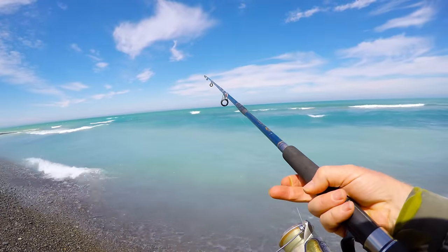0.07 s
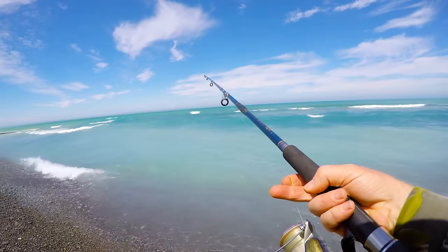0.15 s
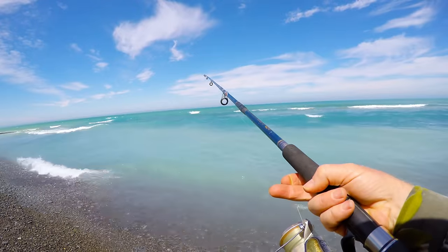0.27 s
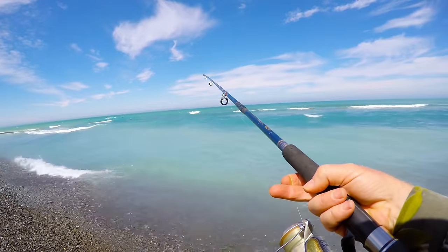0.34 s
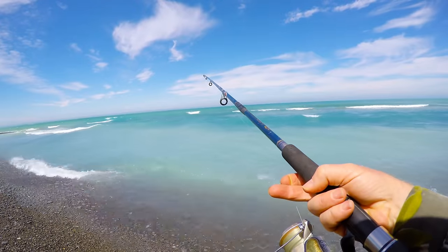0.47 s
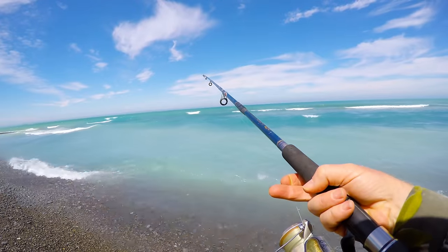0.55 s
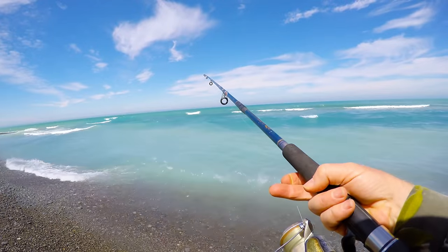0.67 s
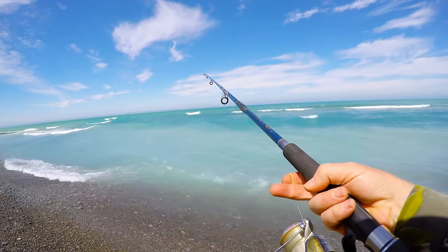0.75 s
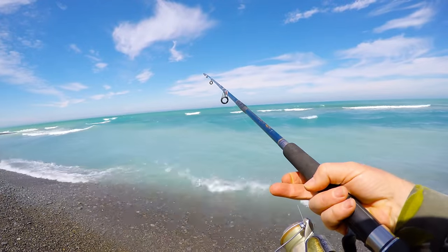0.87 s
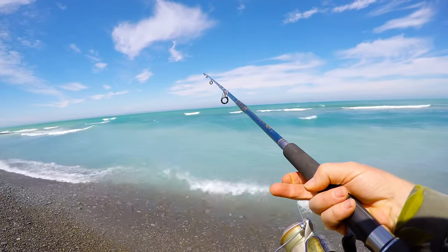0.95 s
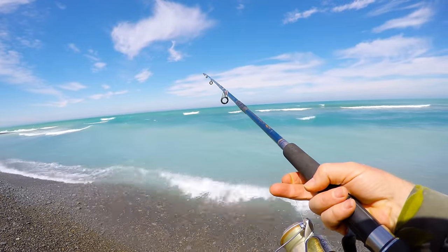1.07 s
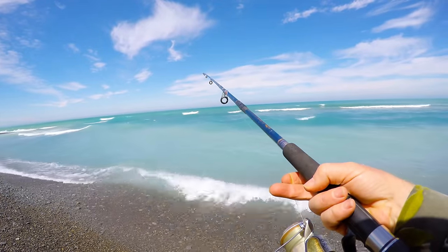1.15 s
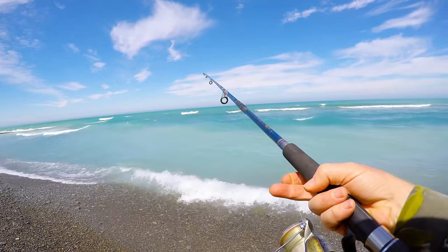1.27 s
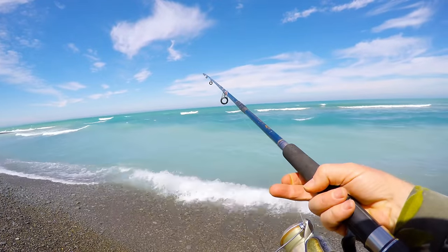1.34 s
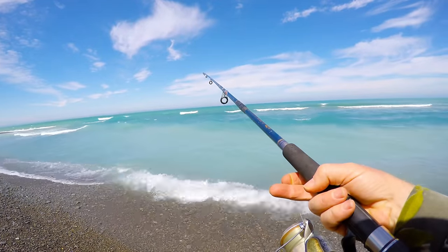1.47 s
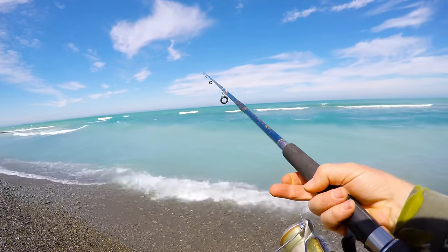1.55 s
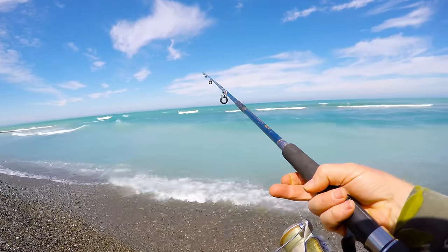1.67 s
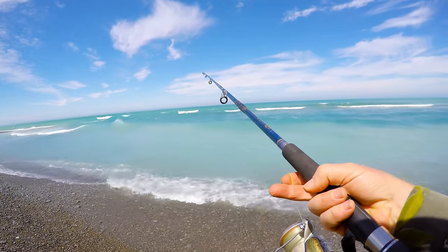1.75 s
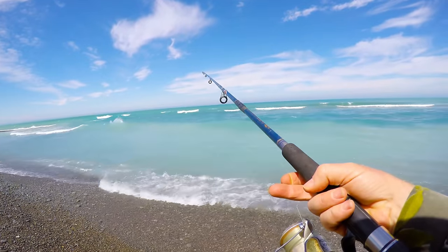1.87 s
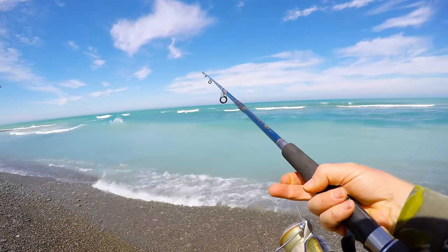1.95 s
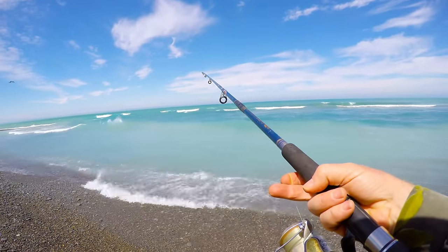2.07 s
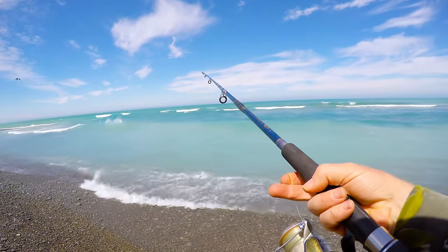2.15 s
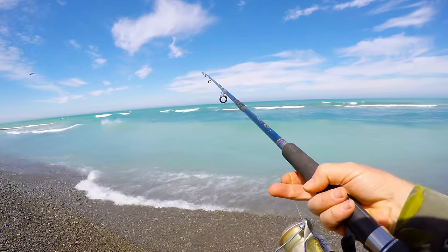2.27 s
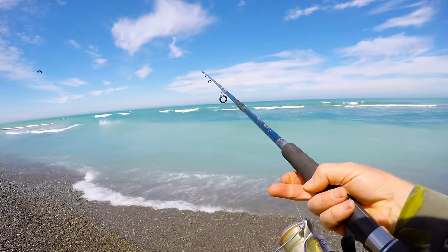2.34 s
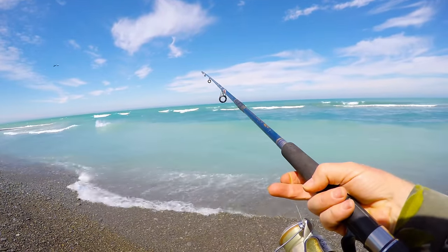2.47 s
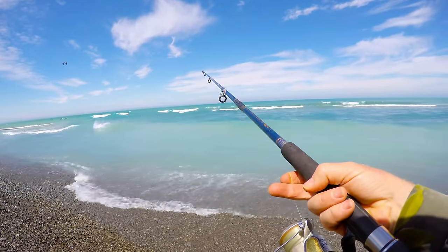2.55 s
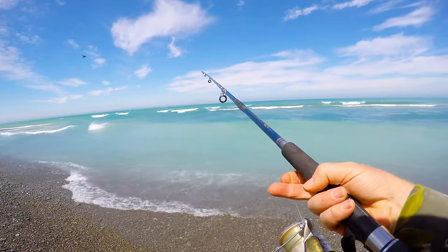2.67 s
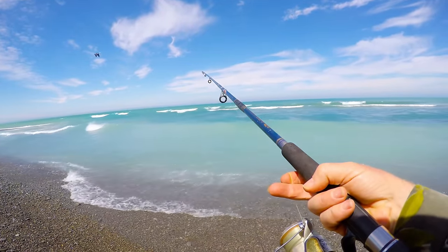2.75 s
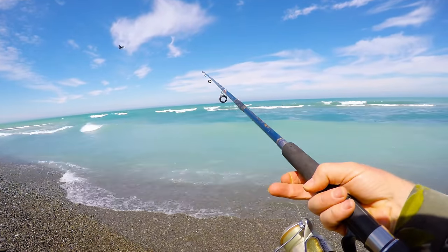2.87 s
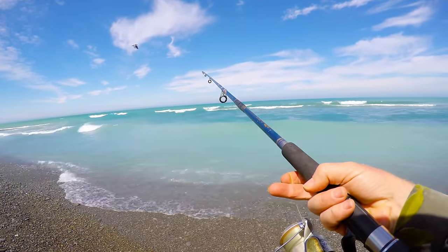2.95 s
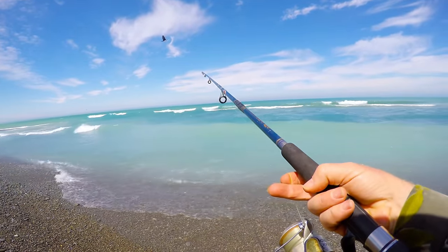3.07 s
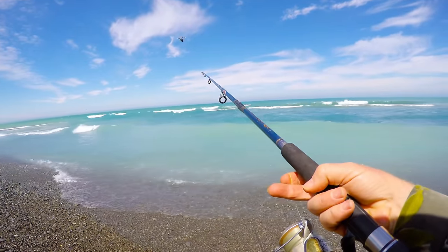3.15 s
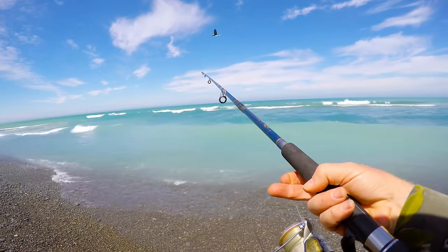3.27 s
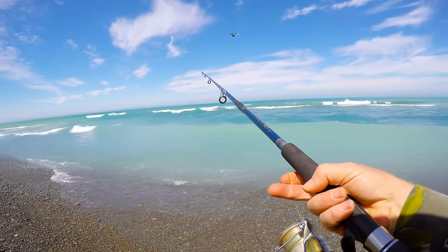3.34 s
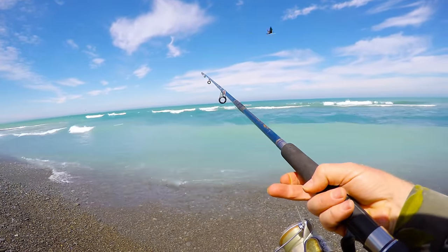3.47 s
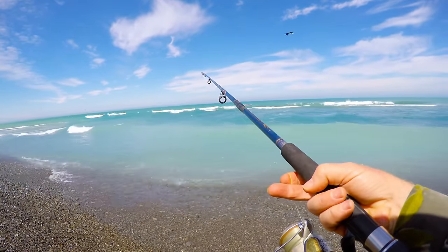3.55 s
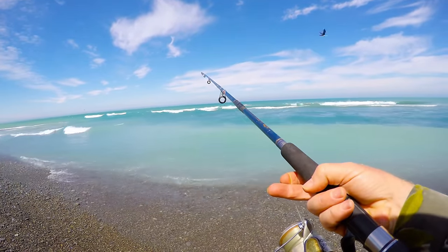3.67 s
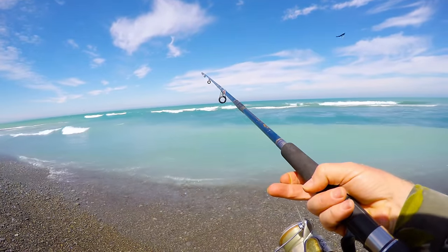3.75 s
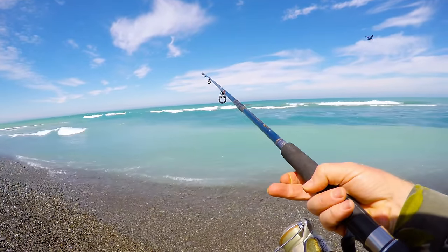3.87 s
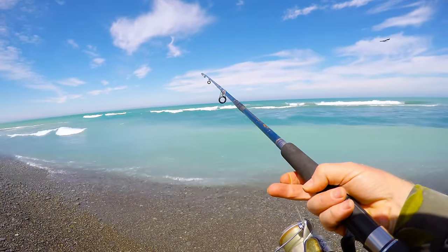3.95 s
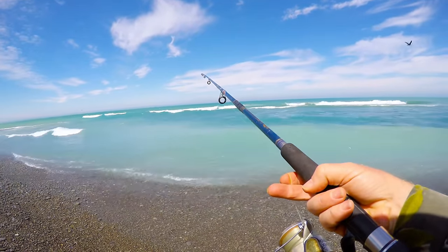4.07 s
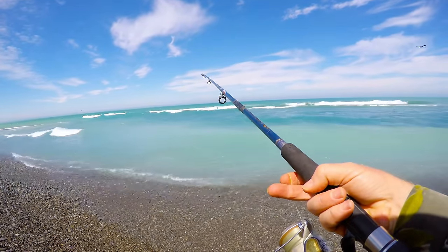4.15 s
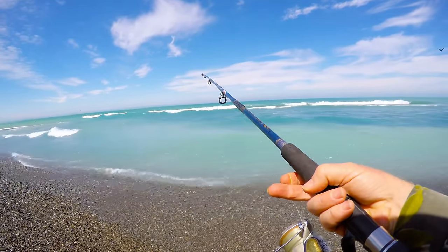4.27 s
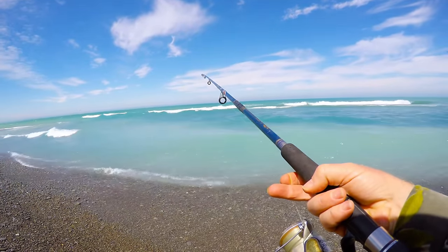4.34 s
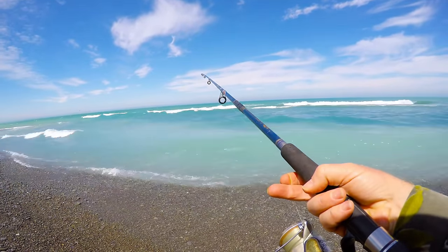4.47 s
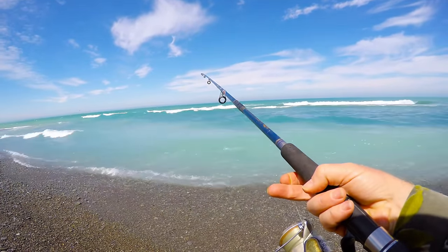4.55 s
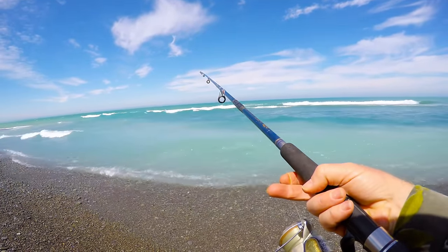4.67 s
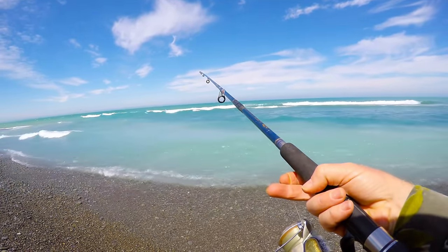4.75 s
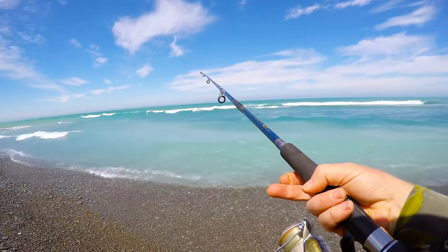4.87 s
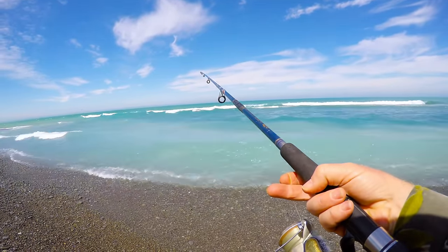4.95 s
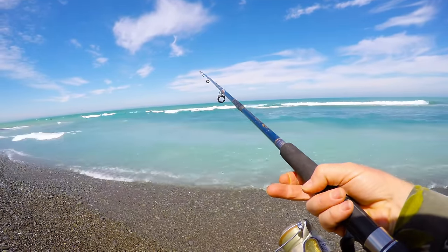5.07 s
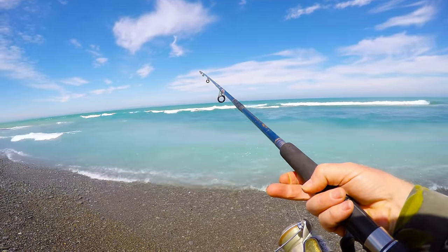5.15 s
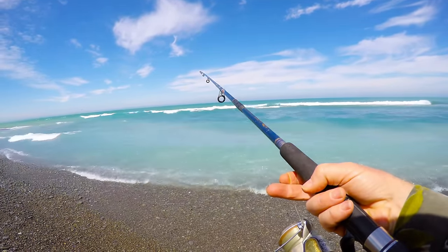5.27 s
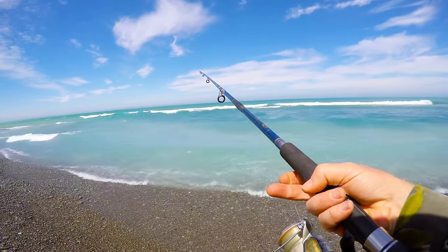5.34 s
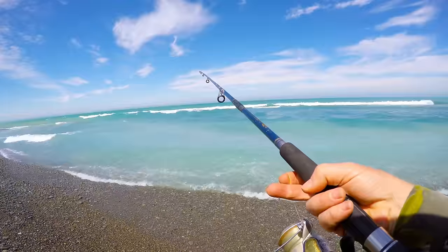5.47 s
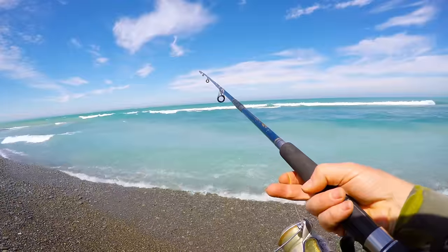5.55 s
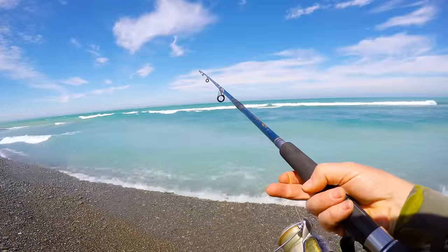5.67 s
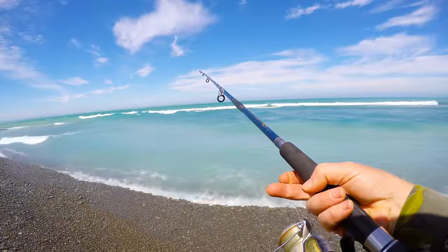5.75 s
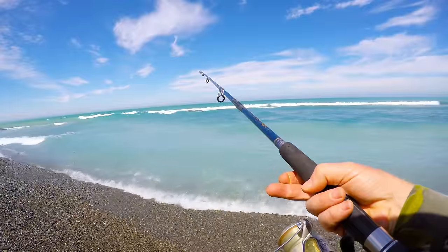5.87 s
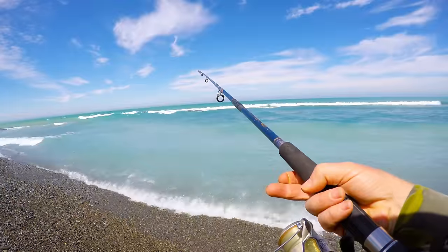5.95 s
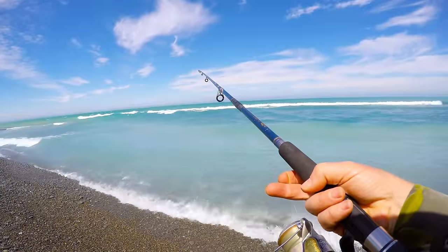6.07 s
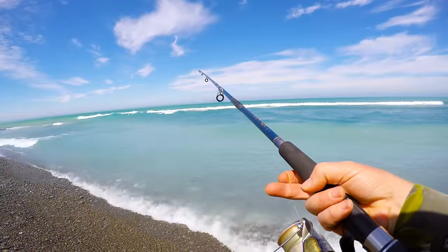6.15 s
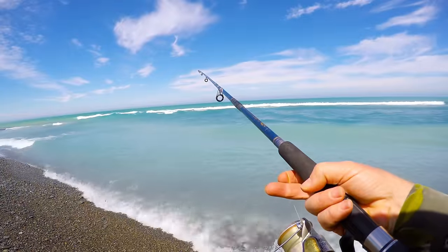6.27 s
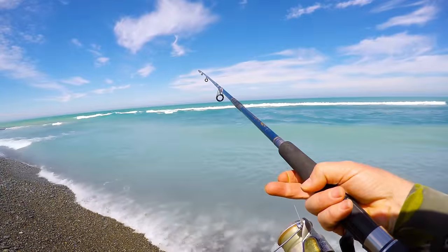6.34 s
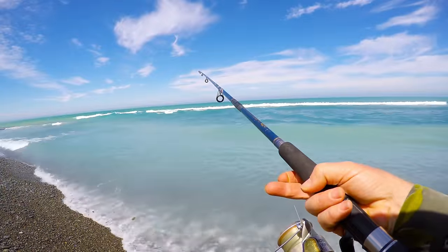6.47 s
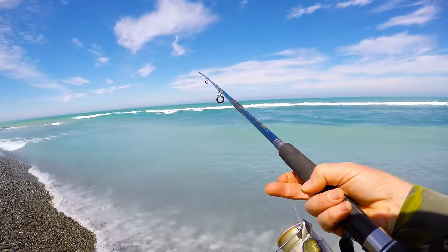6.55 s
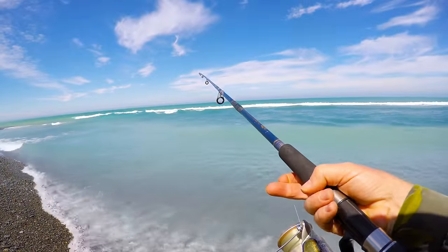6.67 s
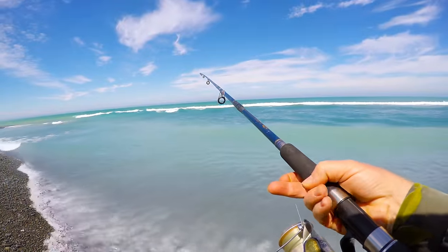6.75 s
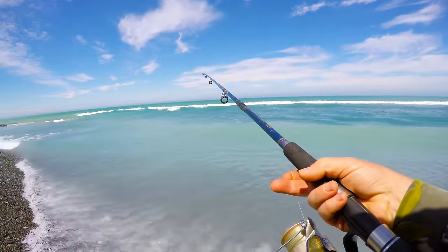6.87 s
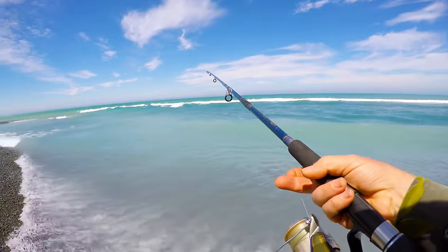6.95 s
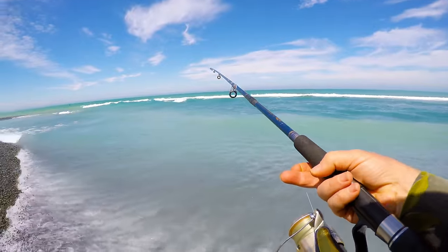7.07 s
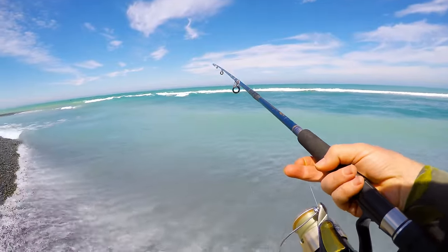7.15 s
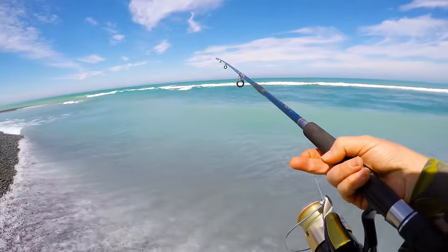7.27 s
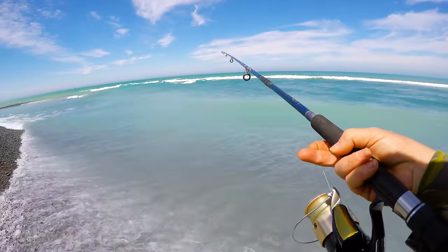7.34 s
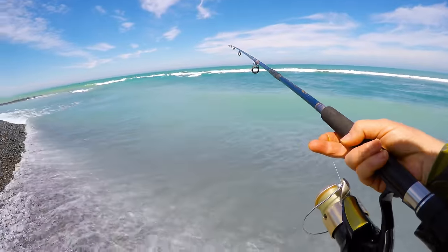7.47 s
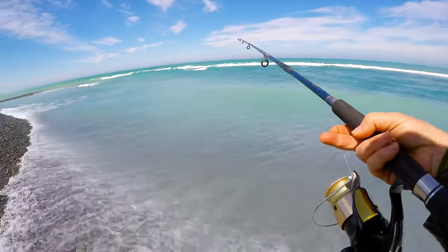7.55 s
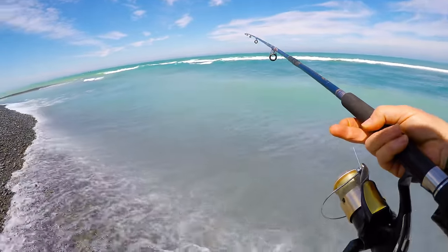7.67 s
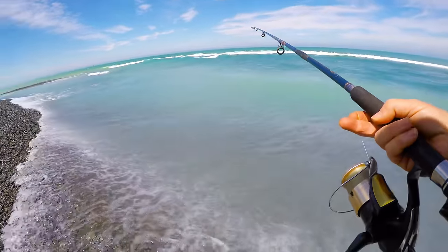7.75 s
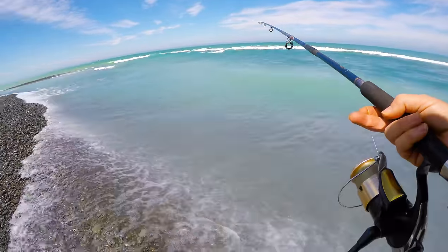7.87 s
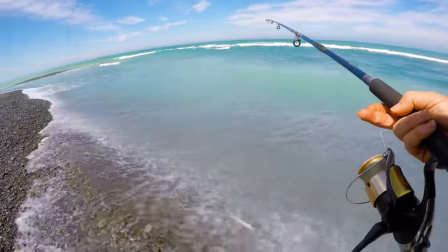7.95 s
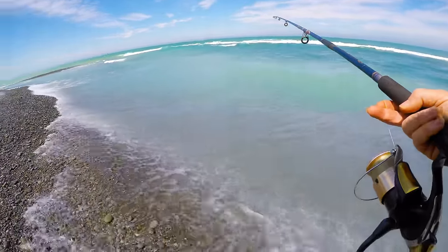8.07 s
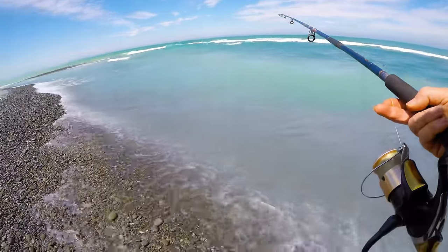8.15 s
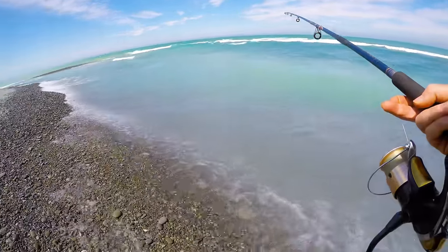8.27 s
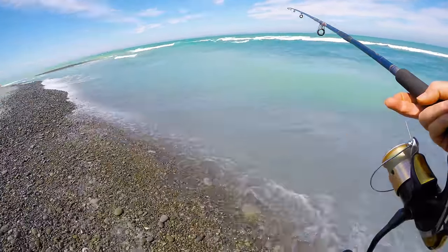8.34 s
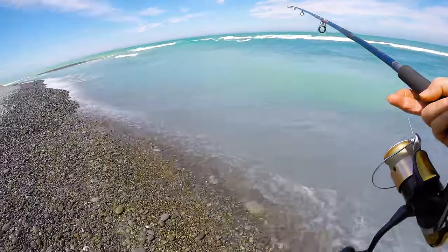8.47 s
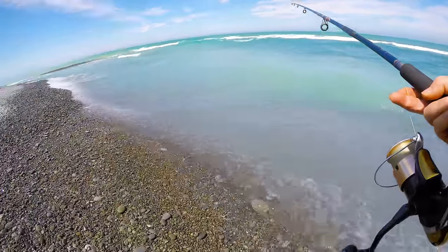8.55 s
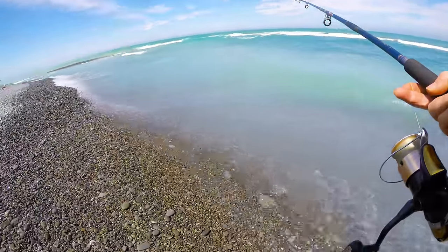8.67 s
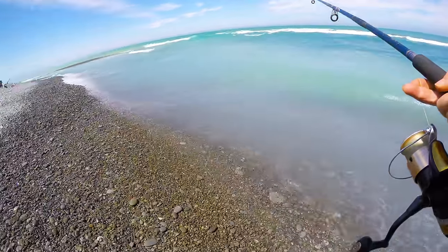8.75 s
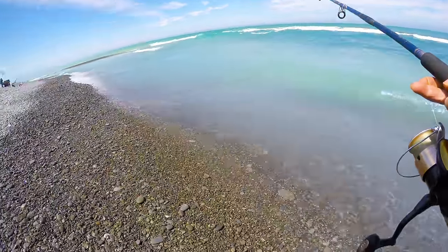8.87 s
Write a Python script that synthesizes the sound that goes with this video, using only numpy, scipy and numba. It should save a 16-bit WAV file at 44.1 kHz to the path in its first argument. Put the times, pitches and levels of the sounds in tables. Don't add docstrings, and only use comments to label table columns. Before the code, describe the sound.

On a pebble shore, a wave drains with a fizzing wash, then smaller splashes and a quiet stretch follow. Near the middle the sound cuts to nothing for an instant and returns. Late on, a quick run-up grows into the strongest surge, which drains back over stones. Wind rumbles and thumps on the closed microphone housing throughout, giving the surf a boxy, muffled colour.

```python
import sys
import numpy as np
from scipy import signal
from scipy.fft import rfft, irfft, next_fast_len
from scipy.io import wavfile
from scipy.ndimage import uniform_filter1d
from numba import njit

SR = 44100
rng = np.random.default_rng(int(sys.argv[2]) if len(sys.argv) > 2 else 0)


def gain_from_db(level_db):
    decades = np.asarray(level_db, float) / 20
    return 10 ** decades


def to_wav(sig):
    pcm = np.clip(np.atleast_2d(sig), -1, 1) * 32767
    pcm = np.round(pcm).astype(np.int16)
    wavfile.write(sys.argv[1], SR, pcm.T)


N = 392931


def unit(x):
    return x / np.sqrt(np.mean(x ** 2))


def colour(table):
    hz, db = np.transpose(table)
    return lambda f: np.interp(np.log(f), np.log(hz), db)


def tint(x, db_of_hz):
    size = next_fast_len(N)
    hz = np.maximum(np.arange(size // 2 + 1) * SR / size, 1)
    return irfft(rfft(x, size) * gain_from_db(db_of_hz(hz)), size)[..., :N]


def walk(rate_hz):
    hold = int(SR / rate_hz)
    steps = np.repeat(rng.standard_normal(N // hold + 1), hold)
    smooth = uniform_filter1d(uniform_filter1d(steps, hold), hold)
    return unit(smooth[:N])


def swells(s, db, rise, fall):
    hop = 64
    since = np.arange(0, N + hop, hop)[:, None] / SR - s
    bells = np.exp(-(since / np.where(since < 0, rise, fall)) ** 2)
    power = (gain_from_db(2 * db) * bells).sum(axis=1)
    return np.interp(np.arange(N), hop * np.arange(len(power)), power)


@njit
def ring(start, turn, fade, glide, size, n):
    out = np.zeros(n)
    for k in range(len(start)):
        z, w, i = size[k] + 0j, turn[k], start[k]
        while abs(z) > .005 * size[k] and i < n:
            out[i] += z.imag
            z *= fade[k] * np.exp(1j * w)
            w *= glide[k]
            i += 1
    return out


def grains(count, low_hz, high_hz, cycles, rise, scatter_db):
    moment, pitch, luck = rng.random((count, 3)).T
    hz = low_hz + (high_hz - low_hz) * pitch
    life = cycles * SR / hz
    size_db = np.minimum(-scatter_db * np.log(1 - luck), 15)
    size = gain_from_db(size_db) / np.sqrt(life)
    start = (moment * N).astype(np.int64)
    turn = 2 * np.pi * hz / SR
    glide = (1 + rise) ** (1 / life)
    return unit(ring(start, turn, np.exp(-1 / life), glide, size, N))


# (crest time [s], level [dB], rise [s], fall [s])
SURGES = [
    (-.1, -38.5, .2, 0.58),
    (1.29, -51, 0.44, 0.59),
    (5.41, -49.5, .21, 0.26),
    (5.95, -43.5, 0.074, 0.35),
    (6.6, -42, 0.28, 0.11),
    (6.92, -33.5, .28, 0.1),
    (7.25, -34.5, .2, 0.34),
    (7.65, -39, 0.31, 0.27),
    (8.85, -48, .15, .3),
]
# (crest time [s], level [dB], rise [s], fall [s])
LANDINGS = [
    (.985, -47.5, .012, 0.5),
    (1.55, -53, 0.085, 0.14),
    (2.08, -51, .08, 0.17),
    (4.48, -56.5, .17, .47),
    (5.86, -49, 0.038, .12),
    (6.0, -46, 0.089, .13),
    (6.42, -55, 0.07, .12),
    (6.89, -42.5, .08, 0.07),
    (7.18, -44, .02, .13),
    (8.54, -49, 0.18, .58),
]
# (crest time [s], level [dB], rise [s], fall [s])
FOAM = [
    (-0.11, -49, 0.2, 0.43),
    (1.06, -58, 0.61, 0.96),
    (4.25, -67, 0.47, 0.34),
    (6.02, -61.5, 0.68, 0.14),
    (6.77, -46.5, 0.47, 0.36),
    (7.21, -52.5, 0.11, 0.26),
    (8.66, -49.5, 0.21, 0.54),
]
# (crest time [s], level [dB], rise [s], fall [s])
BREAKERS = [
    (1.21, -56, 0.5, 0.64),
    (3.0, -62, 0.61, 0.31),
    (4.35, -60.5, 0.5, 0.48),
    (6.24, -53.5, 0.89, 0.32),
    (7.06, -54.5, 0.9, 0.48),
]
SURGE_DB = [-31, -22.5, -9.5, 0.5, -6, -12, -19.5, -29.5]
LANDING_DB = [-10, -25, -17.5, .8, 0, -0.5, -10, -19.5]
FOAM_DB = [-22, -19.5, -20, 3, 4.5, -0.9, 0.5, -7]
BREAKER_DB = [-4, -0.5, -9.5, 4.5, 5, 4.1, -9.5, -31.5]
SEA_DB = [-57, -62, -60.5, -51.5, -51, -56.5, -63.5, -71.5]


def water_db():
    kinds = [(SURGES, SURGE_DB), (LANDINGS, LANDING_DB), (FOAM, FOAM_DB), (BREAKERS, BREAKER_DB)]
    power = 0
    for events, band_db in kinds:
        power = power + gain_from_db(2 * np.array(band_db))[:, None] * swells(*np.transpose(events))
    brief_lift_db = 0.5 * swells(8.2, 0, 0.19, 0.2)
    shore_db = np.array(SEA_DB)[:, None] + brief_lift_db
    return 10 * np.log10(gain_from_db(2 * shore_db) + power)


# (frequency [Hz], width [Hz], level [dB])
HOUSING = [(318, 69, -4.5), (558, 21, 5.5), (640, 83, 5.5), (720, 60, -4.5), (794, 110, -3.5),
           (1025, 230, 4.5), (1297, 310, -3.5), (1655, 410, 7.5), (2400, 180, 2.5), (3070, 87, 1.5),
           (3510, 320, -1.5), (4050, 350, 7.5), (4804, 340, -9), (5700, 210, 5), (6290, 270, -4),
           (6830, 430, 5), (7190, 200, -9), (7290, 650, 3), (8820, 450, -4.5), (9860, 390, -5),
           (10500, 900, 2), (11700, 600, -4.5)]


def housing(hz):
    return sum(db / (1 + (2 * (hz - f) / width) ** 2) for f, width, db in HOUSING)


# (frequency [Hz], level [dB])
SURF_COLOUR = [(60, -4), (150, -19), (400, -12), (1000, -11), (2000, -3), (3500, -13.5), (5500, -24),
               (8000, -32.5), (11000, -36), (15000, -44.5)]
# (low edge [Hz], high edge [Hz])
ZONES = [(140, 300), (400, 720), (850, 1350), (1450, 2150), (2250, 3200), (3600, 4600), (5100, 8300),
         (9000, 14000)]


def surf():
    bubbles = grains(count=30000, low_hz=300.7, high_hz=8970, cycles=8.6, rise=0.0513, scatter_db=2.5)
    ticks = grains(count=40000, low_hz=2550, high_hz=14800, cycles=0.78, rise=0, scatter_db=1.5)
    water = rng.standard_normal(N) + gain_from_db(-8) * bubbles + gain_from_db(-9) * ticks
    size = next_fast_len(N)
    hz = np.maximum(np.arange(size // 2 + 1) * SR / size, 1)
    sound = rfft(water, size) * gain_from_db(colour(SURF_COLOUR)(hz) + housing(hz))
    power = 2 * np.abs(sound) ** 2 / size / N
    lift_db = []
    for db, (low, high) in zip(water_db(), ZONES):
        lift_db.append(db - 10 * np.log10(power[(hz > low) & (hz < high)].sum()))
    middles = np.log2(np.sqrt(np.prod(ZONES, axis=1)))
    out, shared, before = 0, walk(18), walk(25)
    for octave in np.arange(6, 14.1, 1 / 3):
        place = np.interp(octave, middles, np.arange(len(ZONES)))
        k = min(int(place), len(ZONES) - 2)
        db = lift_db[k] + (place - k) * (lift_db[k + 1] - lift_db[k])
        own = walk(25)
        fine = np.clip((octave - 10) / 5.5, 0, 1)
        db = db + (0.072 + 0.25 * fine) * shared
        db = db + (0.35 + 0.27 * fine) * (own + before)
        before = own
        share = np.clip(1 - 3 * np.abs(np.log2(hz) - octave), 0, 1)
        out = out + gain_from_db(db) * irfft(sound * share, size)[:N]
    return out


# (time [s], level [dB], centre [Hz], rise [s], fall [s])
SPLASHES = [(.02, -41.5, 2400, 0.037, 0.52), (.62, -44.5, 2400, .05, 0.41), (.975, -47, 3150, .004, .1),
            (.977, -47, 4050, .006, .12), (1.291, -40, 4020, .01, 0.048), (5.9, -42, 2400, .05, .3),
            (6.3, -49, 5700, .05, .3), (6.65, -49, 2400, .08, 0.23), (7.0, -46, 3000, 0.12, 0.9),
            (7.953, -62, 8000, 0.00084, .004), (8.368, -50, 5700, .002, .006),
            (8.44, -56, 7000, .001, .004), (6.97, -45, 1000, .03, .12), (7.7, -44, 2120, .05, 0.22),
            (2.25, -61, 720, .05, .2), (5.84, -55, 5700, .006, .15)]


def splashes():
    out = np.zeros(N)
    for s, db, hz, rise, fall in SPLASHES:
        width_hz = hz / 13 + 1.7 / rise
        edges_hz = [hz - width_hz / 2, hz + width_hz / 2]
        band = signal.butter(2, edges_hz, "band", fs=SR, output="sos")
        spray = unit(signal.sosfilt(band, rng.standard_normal(N)))
        since = np.maximum(np.arange(N) / SR - s, 0)
        out += gain_from_db(db) * spray * (1 - np.exp(-since / rise)) * np.exp(-since / fall)
    return out


# (time [s], slow buffet level [dB], faster flutter level [dB], rise and fall [s])
GUSTS = [(.12, -41, -51, 0.056), (.38, -44.5, -47.5, .08), (.65, -43, -50, 0.19), (1.08, -40, -47, .14),
         (1.5, -40, -43.5, .2), (1.95, -47.5, -45, .12), (2.268, -40, -42, 0.086), (2.55, -43, -43.5, 0.18),
         (3.0, -46, -42.5, 0.14), (3.72, -52, -44.5, 0.077), (3.9, -41, -60, 0.069),
         (4.25, -41.5, -52, 0.25), (5.0, -40, -46, .08), (5.25, -48, -53, .07), (5.75, -39, -55, .2),
         (6.12, -43, -47, 0.057), (6.36, -36, -52, 0.049), (6.62, -39, -46, .08), (6.93, -40.5, -48, .12),
         (7.4, -38, -50, .11), (7.75, -38, -47.5, 0.11), (8.17, -38, -41.5, 0.15), (8.499, -39, -52, 0.11)]
# (frequency [Hz], level per Hz [dB])
WIND_COLOUR = [(4.7, -33), (8.0, -3), (27, 7), (39, 4), (61, -0.5), (155, -16), (200, -33.5), (260, -50),
               (440, -120)]
# (time [s], peak level [dB], swing rate [Hz], length [swings], push +1 or pull -1)
SLAPS = [(.889, -31, 55, 0.55, -1), (1.099, -28, 45, 0.5, 1), (2.209, -29, 38, 0.6, 1),
         (2.255, -28, 39, 0.5, 1), (2.314, -27.5, 50, 0.84, 1), (2.91, -29.5, 51, 0.61, -1),
         (3.167, -27.5, 30, 0.75, -1), (3.466, -30.5, 41, 0.28, -1), (4.271, -28, 35, 0.75, 1),
         (4.386, -29, 25, 0.43, -1), (5.002, -32, 28, 0.57, -1), (5.026, -31, 45, .7, 1),
         (8.094, -24.5, 27.6, 1.24, -1), (8.156, -23, 40, 0.92, 1), (8.188, -29, 45, 0.54, 1),
         (8.213, -28.5, 20, 0.57, -1), (8.243, -33, 26, .5, 1), (8.263, -28.5, 34, 0.71, -1),
         (8.366, -21, 42.6, 0.86, 1), (8.478, -28, 25, 0.58, 1)]


def wind():
    s, buffet_db, flutter_db, length = np.transpose(GUSTS)
    buffet = np.sqrt(gain_from_db(2 * -46) + swells(s, buffet_db, length, length))
    flutter = np.sqrt(gain_from_db(2 * -49.5) + swells(s, flutter_db, length, length))
    air = tint(rng.standard_normal(N), colour(WIND_COLOUR))
    low = tint(air, colour([(44, -0.5), (62, -35)]))
    gusts = buffet * unit(low) + flutter * unit(air - low)
    calm, slaps = np.ones(N), np.zeros(N)
    for s, db, hz, swings, push in SLAPS:
        turns = (np.arange(N) / SR - s) * hz
        calm *= 1 - 0.49 * np.exp(-(turns / (1.5 * swings)) ** 2)
        slaps += push * gain_from_db(db) * np.exp(-(turns / swings) ** 2) * np.cos(2 * np.pi * turns)
    return gusts * calm + slaps


def scene():
    return np.tile(surf() + splashes() + wind(), (2, 1))


BAND_EDGES_HZ = [7600, 8300, 8800, 9300, 9800, 10300, 10800, 11300, 11700, 12100, 12500, 12900, 13300,
                 13700, 14100, 14500, 22050]
# (frequency [Hz], level re centre [dB])
SIDE_COLOUR = [(25, -27), (70, -28), (250, -11.5), (1000, -19.5), (4000, -14.5), (8000, -11), (11500, -8),
               (14000, -8)]


def camera_treble_loss(x):
    frame = dict(window="cosine", nperseg=2048, noverlap=1024)
    scatter_db = 1.2
    hz, s, cells = signal.stft(x, SR, **frame)
    power = np.abs(cells) ** 2
    floor_db = 6 * np.log10(power[hz < 100].sum(axis=0) + 1e-12) - 79
    floor_db += 1.1 * scatter_db * rng.standard_normal(len(s))
    for k, (low, high) in enumerate(zip(BAND_EDGES_HZ, BAND_EDGES_HZ[1:])):
        band = (hz >= low) & (hz < high)
        limit = gain_from_db(2 * (floor_db + .02 * k + scatter_db * rng.standard_normal(len(s))))
        loud_band = power[band].mean(axis=0) > limit
        loud_lines = power[band] > limit / 2
        cells[band] *= loud_band * loud_lines * (high < SR / 3)
    runs = uniform_filter1d(rng.standard_normal(len(s)), size=2)
    patches = np.repeat(rng.random((len(hz) // 24 + 1, len(s))), 24, axis=0)[:len(hz)]
    split = np.where(runs < np.quantile(runs, .45), patches < .7, patches < .08)
    side = split * gain_from_db(colour(SIDE_COLOUR)(hz + 1))[:, None]
    error = side * np.exp(2j * np.pi * rng.random(cells.shape))
    both = cells + np.abs(cells) * error * np.array([1, -1])[:, None, None]
    return signal.istft(both, SR, **frame)[1][:, :N]


def roll_off(x):
    return signal.sosfilt(signal.butter(12, 14600, fs=SR, output="sos"), x)


def record(dry):
    stop_s, fade_s = 3.4677, .018
    since = np.arange(N) / SR - stop_s
    fade = np.where(since < 0, 1, np.clip(since / fade_s, 0, 1))
    mix = camera_treble_loss(dry[0]) * fade
    return roll_off(mix)


dry = scene()
out = record(dry)
to_wav(out)
```